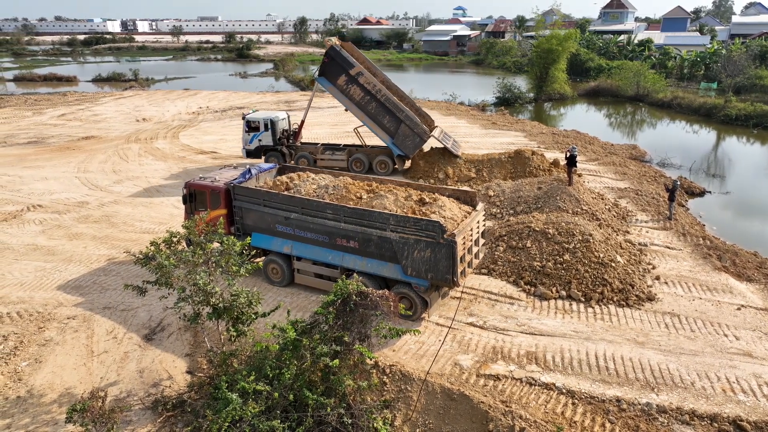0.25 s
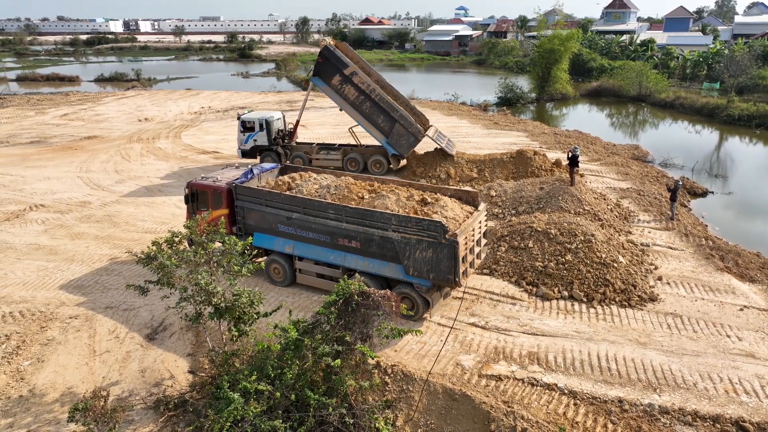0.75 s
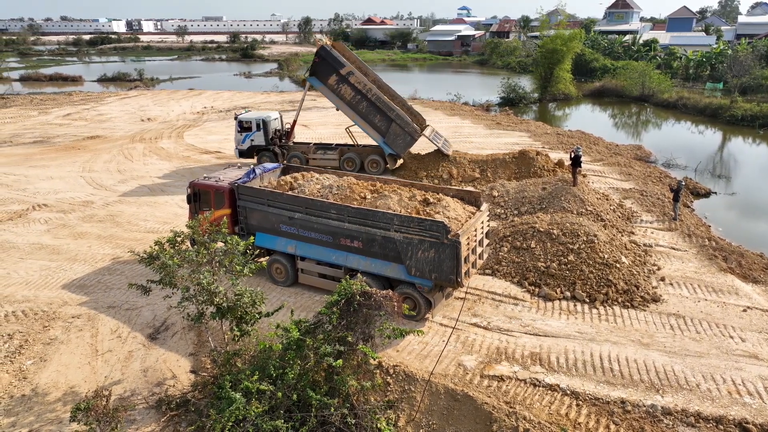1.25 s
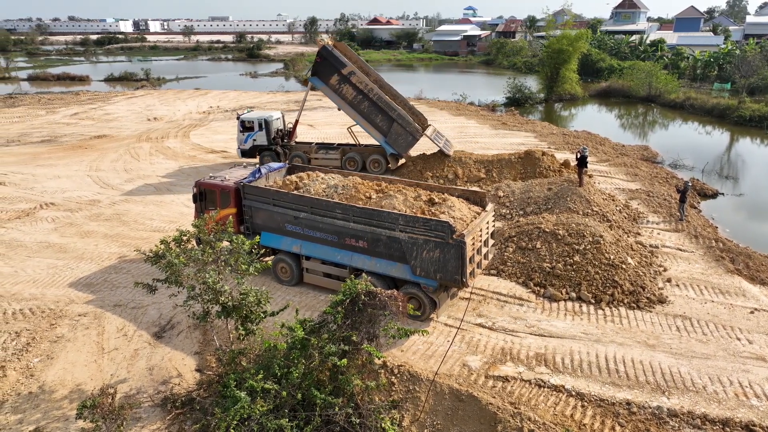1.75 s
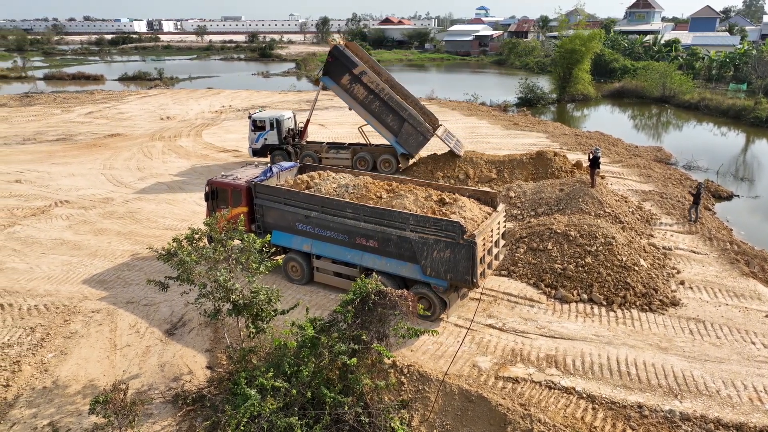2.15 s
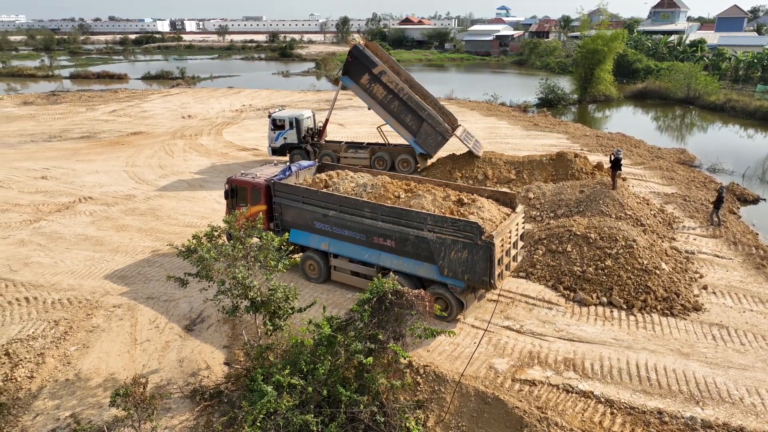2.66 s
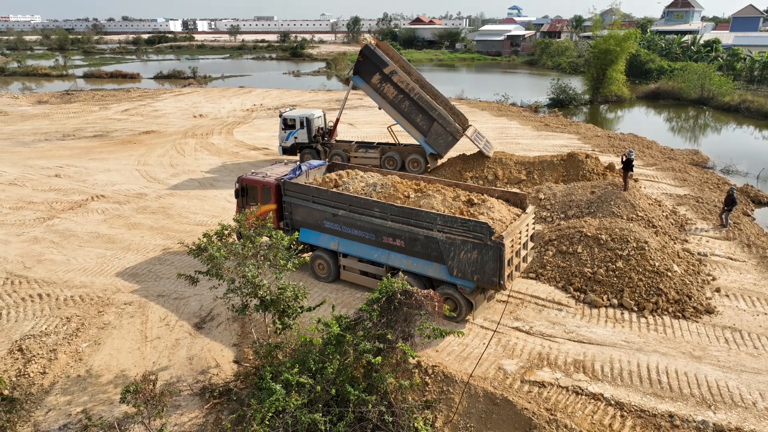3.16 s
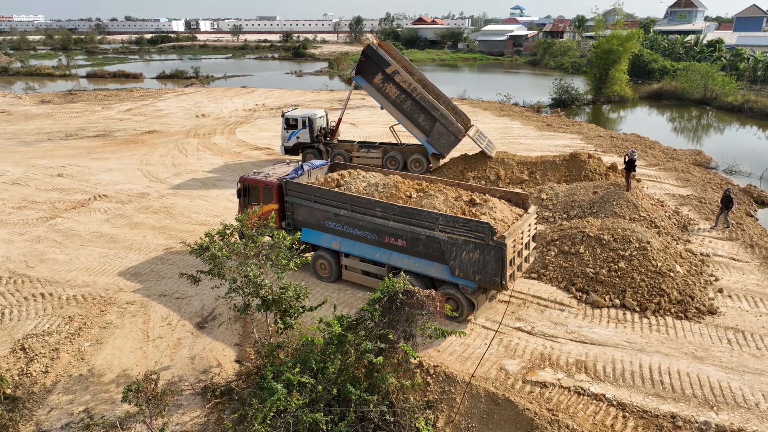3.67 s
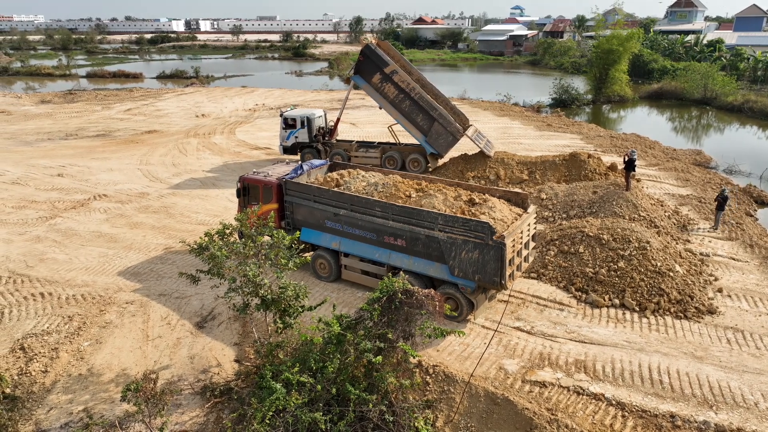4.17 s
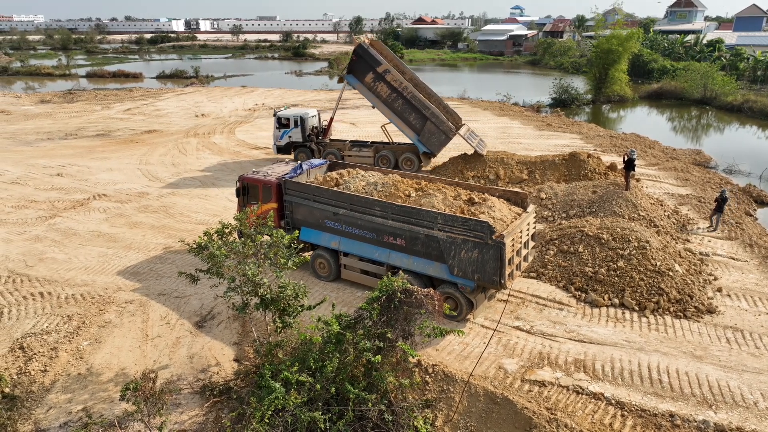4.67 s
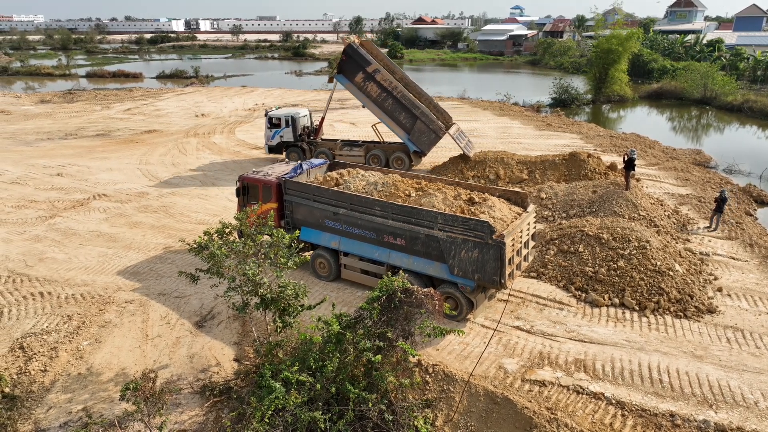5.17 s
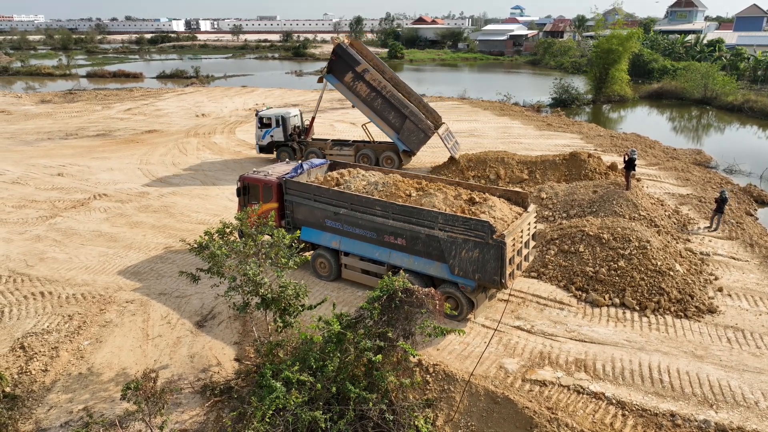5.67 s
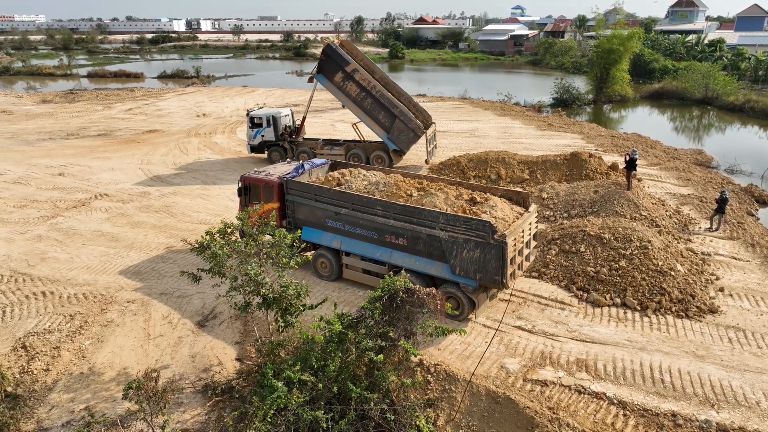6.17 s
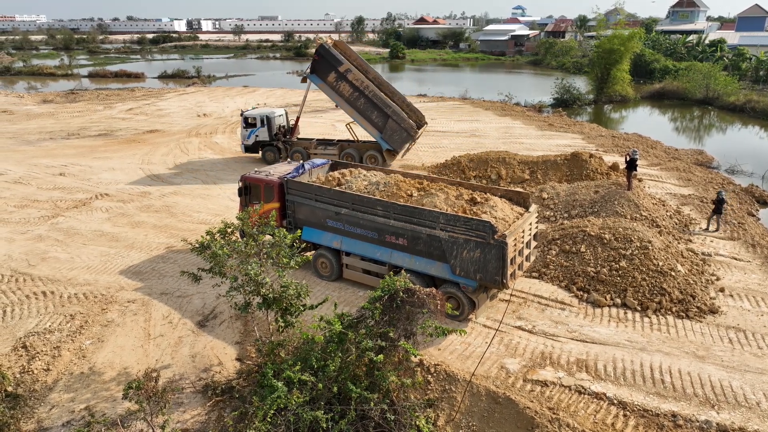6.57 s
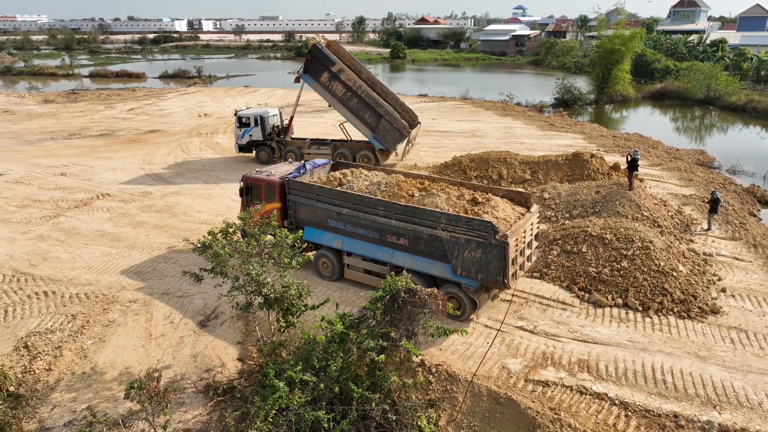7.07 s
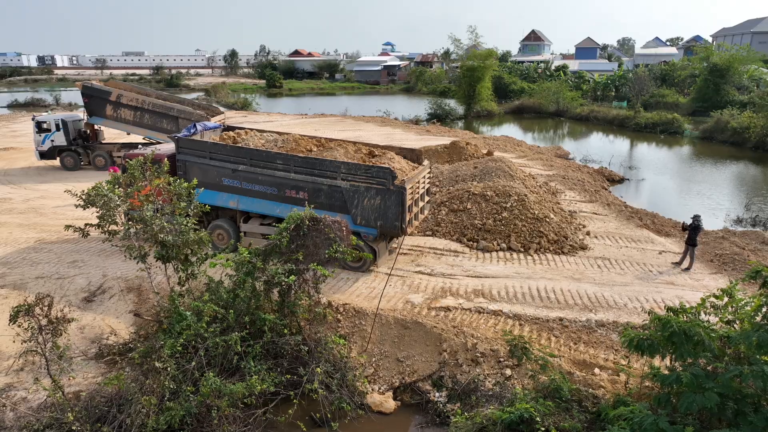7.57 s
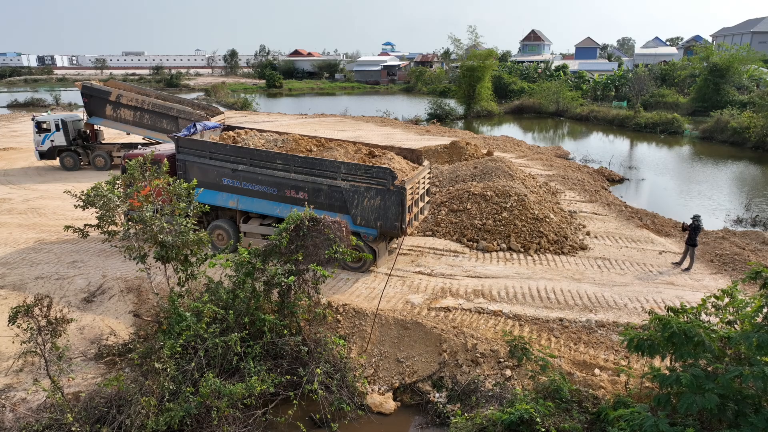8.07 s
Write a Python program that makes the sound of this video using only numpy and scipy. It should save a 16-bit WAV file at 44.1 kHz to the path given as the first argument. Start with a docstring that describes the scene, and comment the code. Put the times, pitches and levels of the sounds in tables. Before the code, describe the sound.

Outdoors on bare soil, a far diesel engine winds down and its roar recedes with a thin turbo whistle. A second engine surges and labours while low rumble swells as a load tips. Loose tailgate knocks lead to a heavy steel slam near seven seconds. A tiny silent cut follows, then a closer, louder diesel idles steadily with clattering knock and tiny air puffs. Stereo microphones, dull top treble.

```python
"""Two diesel trucks work far off on open soil, built from exhaust tones and roar: one engine slows, one surges.
Struck plate modes make a steel tailgate knock and slam, low noise swells as rumble, filtered hiss makes
air valves puff. After a hard cut with a short silence a third engine idles and clatters closer by, its
knock ringing the engine block, with more puffs. A pair of microphone ports hears each engine straight,
off a face nearby and scattered."""
import sys
import numpy as np
from scipy import signal
from scipy.fft import rfft, irfft
from scipy.io import wavfile
from scipy.ndimage import uniform_filter1d

SR = 44100
rng = np.random.default_rng(int(sys.argv[2]) if len(sys.argv) > 2 else 0)


def voltage_ratio(level):
    """Linear amplitude factor for a level in decibels (scalar or array-like)."""
    return 10 ** (np.asarray(level, float) / 20)


def int16_out(signal):
    """Quantize to a 16-bit WAV file."""
    q = np.round(np.clip(np.atleast_2d(signal).T, -1, 1) * 32767)
    wavfile.write(sys.argv[1], SR, q.astype(np.int16))


N = 366912

# Exhaust tones of the slowing engine. Each row: multiple of shaft speed, relative level in dB.
SLOWING_ORDERS = [(3, 2), (5, -9.5), (6, -2.5), (7, -11), (8, -.5), (9, -10), (11, -13.5), (15, -12)]
# Course of the surging engine. Each row: time in seconds, firing rate in Hz, exhaust level in dB.
SURGING_COURSE = [(2.2, 41, -38), (2.75, 43, -42.5), (3.1, 44.3, -37.5), (3.5, 46.4, -27.5),
                  (3.72, 44, -33), (3.85, 41.1, -40), (4.05, 40, -39), (4.5, 44.9, -37.5),
                  (4.85, 45.85, -33), (5.1, 45.3, -33.5), (5.35, 43.1, -34), (6.0, 42.8, -31),
                  (6.5, 44.84, -29), (7.3, 48.2, -32)]
# Exhaust tones of the surging engine. Each row: multiple of firing rate, relative level in dB.
SURGING_ORDERS = [(2, -14), (8 / 3, -4), (3, 0), (3.5, -20), (5, -17)]
# Exhaust tones of the idling engine. Each row: multiple of firing rate, relative level in dB.
IDLING_ORDERS = [(1, -19), (2, 2), (3, -3), (3.5, -9), (4, -5.5), (5, -5.5), (5.5, -2), (6, -4), (7, -5.5),
                 (9, 0.5), (10, -6.5), (22, -3.5), (32.7, -5)]
# Spectrum of the far trucks' roar before its treble lift. Each row: frequency in Hz, level in dB.
FAR_COLOUR = [(32, -74), (45, -7), (130, -6), (300, -10), (365, -21), (430, -21.5), (600, -18),
              (760, -16.5), (900, -21.5), (1150, -20), (1700, -25), (2200, -28), (3300, -34), (4000, -32),
              (5200, -33.5), (8500, -39.5), (10200, -35), (11500, -48.5), (12300, -57)]
# Spectrum of the near truck's roar before its treble lift. Each row: frequency in Hz, level in dB.
NEAR_COLOUR = [(30, -4), (60, -2), (150, -8), (330, -2), (450, -9.5), (700, -3.5), (1100, -8.5), (1700, -9),
               (2700, -20), (4000, -27.5), (6000, -35), (8500, -40.5), (10000, -33), (11500, -45),
               (12500, -48)]
# Resonances of the engine block. Each row: frequency in Hz, width in Hz of each of two passes,
# relative level in dB, strength of the steady rattle beside the firing bursts.
BLOCK_RESONANCES = [(603, 30, -7, 2.5), (896, 30, -5, 2.5), (1285, 70, -4, 1), (1680, 240, 5, .07),
                    (2715, 300, -5.5, .03)]
# Tailgate blows. Each row: start in seconds, level in dB before a common trim, weight from 0 to 1,
# frequency in Hz round which the struck spot favours the modes.
TAILGATE_BLOWS = [(0.46, -19, 0.22, 1160), (5.226, -10.5, 0.11, 1900), (5.39, -24, 0.34, 600),
                  (5.404, -21.5, 0, 1170), (5.563, -13, 0, 685), (5.582, -23.5, 0.23, 1150),
                  (5.838, -12, 0, 1150), (5.862, -29, 0.14, 1120), (6.788, -19.5, 0, 2070),
                  (6.796, -10, 0.48, 1050), (6.803, -5.5, 0.45, 935), (6.85, -21.5, 0.91, 121),
                  (6.957, -27, 0.83, 226), (7.168, -18, 0, 804)]
# Plate modes of the tailgate. Each row: nominal frequency in Hz, relative level in dB,
# time in seconds to die by 60 dB, before the blow's ring factor.
TAILGATE_MODES = [(112.9, -1, 0.48), (200, -1, 0.81), (216, -6.5, 1.1), (261, -7, 1.24), (337, -24, 0.87),
                  (413, -20, 0.36), (477, -18, 0.27), (538, -4, 0.46), (589, -12, 0.94), (719, -6, 0.66),
                  (955, -5, 0.43), (1005, -14.5, 1.1), (1110, -5, 0.28), (1143, -10.5, 0.37),
                  (1196, -15.5, 1.27), (1573, -7, 0.17), (1697, -12, 0.2), (2070, -10, 0.22),
                  (2220, -17, 0.3), (2370, -10.5, 0.12), (3234, -18, 0.18), (3930, -15, 0.14),
                  (4180, -18, 0.1)]
# Spectrum of a blow's noisy slap, before the blow's tilt. Each row: frequency in Hz, level in dB.
SLAP_COLOUR = [(60, -33), (150, 3.5), (600, 0), (1150, -3), (1550, -12.5), (2150, -14.5), (3200, -20),
               (4300, -21), (9000, -39), (10500, -68)]
# Air valve puffs. Each row: start in seconds, level in dB before the fades, centre in Hz,
# width in Hz, length in seconds.
PUFFS = [(0.457, -37, 5740, 4000, 0.031), (5.922, -41.5, 3800, 2500, 0.073), (6.07, -43, 3800, 2500, 0.13),
         (7.433, -44, 11000, 1500, 0.029), (7.62, -40.5, 10000, 2500, 0.027),
         (7.803, -37.5, 6000, 400, 0.022), (7.914, -36.5, 5730, 800, 0.023), (8.02, -35, 6000, 350, 0.025),
         (8.022, -42, 5480, 200, 0.022)]
# Power that reaches the ports unscattered. Each row: frequency in Hz, share of the power.
STRAIGHT_SHARE = [(150, .97), (350, .9), (900, .8), (2400, .66), (2900, .45), (4500, .45), (7500, .45),
                  (9600, .93), (9900, .99), (10600, .99), (11200, .75)]
# The silence at the cut: start in seconds, end in seconds.
SILENCE_S = (7.2802, 7.2884)
# Port balance for the far trucks. Each row: frequency in Hz, left louder by dB.
FAR_BALANCE = [(300, .4), (640, -4), (1150, -2.5), (2100, .5), (6500, 5.5), (9500, .5)]
# Port balance for the near truck. Each row: frequency in Hz, left louder by dB.
NEAR_BALANCE = [(330, .7), (640, -7.5), (1150, -5), (2100, -1), (6500, 4.5), (9500, .5)]
# Port phase for the far trucks. Each row: frequency in Hz, left leads by radians.
FAR_LEAD = [(0, 0), (700, -.6), (2100, -1), (3000, 3.5), (4200, 5.5), (5300, 3.5), (7000, 6.5), (8300, 8.5),
            (8700, 6.2), (9800, 3.15), (10400, 3.1), (11700, 0)]
# Port phase for the near truck. Each row: frequency in Hz, left leads by radians.
NEAR_LEAD = [(0, 0), (600, -1.4), (1500, -1), (2500, -2.1), (3300, -3.3), (5000, -5.2), (7200, -7.2),
             (8200, -4), (8700, -6.4), (9800, -9.42), (10850, -9.45), (11700, -12.56)]
# Swells of low rumble. Each row: start in seconds, rise in seconds, length in seconds with the rise,
# level in dB at the start of the growth, growth in dB per second.
SWELLS = [(4.082, 0.17, 0.42, -22.5, -10.5), (4.6, 0.31, 0.6, -23, -1), (5.397, 0.07, 0.32, -17, -14),
          (5.783, 0.11, 0.57, -20.5, 10.5), (6.79, 0.046, 0.23, -21, -13)]
# The turbo whistle is heard: from seconds, to seconds.
TURBO_SPAN_S = (.45, 2.85)

FAR_BEAT, NEAR_BEAT = .25, .2  # depth of the firing beat in the roar
PATCHY_DB = .8  # rms of the drifting patches in every roar

# slowing engine: top of its arch, exhaust level there and fall with speed, end of its exhaust tones
TOP_S, TOP_HZ, SAG_HZ_PER_S2 = .55, 21.3, 1.85
TOP_DB, FALL_DB_PER_HZ, SHUT_S = -28, 2, 2.5
# its truck pulls away; roar level at the first distance, treble lift
LEAVE_S, DISTANCE_M, SPEED_M_PER_S, LEAVING_DB, LEAVING_LIFT_DB = 0.96, 27.2, 19.8, -32, 2.5
# its turbo whistle lags the engine: top of the arch, level at the first distance
TURBO_S, TURBO_HZ, TURBO_DB, TURBO_SAG_HZ_PER_S2 = 1.4, 5175, -47.5, 370

# tailgate: factor on the modes' ring time, tilt of the spectrum, share of slap, for weights 0 and 1
LIGHT_RING, HEAVY_RING = 0.33, 1.03
LIGHT_TILT_DB_PER_OCTAVE, HEAVY_TILT_DB_PER_OCTAVE = 3, -5.5
LIGHT_SLAP, HEAVY_SLAP = .62, 1.7
RATTLE_DB, RATTLE_T60_S, RATTLE_HZ = -17.5, 0.57, 55  # latches rattle on after a blow
SPOT_DB, SPOT_OCTAVES = 8, .3  # lift of the favoured modes and its reach

# surging engine: roar level at an exhaust level of -35 dB, share of exhaust changes that it follows
SURGE_ROAR_DB, SURGE_FOLLOW, SURGE_LIFT_DB = -41, 0.53, -3.5
SURGING_HUM_DB, HUM_FROM_S = -39, 2.55  # hum close to the firing rate, whatever the load
SWELL_FALL_DB_PER_S, BED_DB, BED_FROM_S = 78, -38, 2.5  # the bed is a constant rumble under the swells
SWELL_ROAR_DB = -22.5  # loose soil and panels rustle with each swell, this far under it

# idling engine
IDLE_HZ, IDLE_DB, FIRST_FIRING_S = 27.37, -32.5, 7.2712
IDLE_ROAR_DB, IDLE_LIFT_DB = -22.5, 4
BLOCK_DB, KNOCK_FADE_DB_PER_S = -22.5, 7  # the knock softens as the engine settles


def evened(x):
    """Scales to rms 1."""
    return x / np.sqrt(np.mean(x ** 2) + 1e-20)


def read(points, hz):
    """Reads a spectrum on a log-frequency axis."""
    f, value = np.transpose(points)
    return np.interp(np.log(hz + 1), np.log(f + 1), value)


def columns(rows, t):
    """Reads the curves of a table at times t."""
    s, *curves = np.transpose(rows)
    return [np.interp(t, s, curve) for curve in curves]


def drift(top_hz):
    """Slow chance of rms 1: noise kept under top_hz."""
    return evened(signal.lfilter(*signal.butter(2, top_hz, fs=SR), rng.standard_normal(N)))


def resonate(x, hz, width):
    """Shifts hz down to zero, smooths, and shifts back: a resonance of gain 1."""
    turn = np.exp(2j * np.pi * np.cumsum(hz * np.ones(len(x))) / SR)
    r = np.exp(-np.pi * width / SR)
    smooth = signal.lfilter([1 - r], [1, -r], x / turn)
    return 2 * (turn * smooth).real


def coloured(x, points):
    """Filters by a spectrum."""
    gain = voltage_ratio(read(points, np.fft.rfftfreq(len(x), 1 / SR)))
    return irfft(rfft(x) * gain, len(x))


def exhaust(hz, db, span, orders, waver_db, low_hz):
    """Tones on multiples of the engine speed, each wavering alone; the pipe hardly sounds under low_hz."""
    t = np.arange(N) / SR
    turns = np.cumsum(hz) / SR
    tones = 0
    for k, order_db in orders:
        level = voltage_ratio(order_db + waver_db * drift(7.8))
        pipe = 1 / (1 + (low_hz / (k * hz)) ** 12)
        tones = tones + level * pipe * np.cos(2 * np.pi * (k * turns + rng.random()))
    running = uniform_filter1d(1. * (t < span[1]) * (t >= span[0]), 2000)  # soft ends
    return np.sqrt(2) * voltage_ratio(db) * running * tones, turns


def firings(turns, fade):
    """A burst at each whole turn dies over the share fade of a turn; firings differ a little in strength."""
    strength = voltage_ratio(1.5 * rng.standard_normal(int(turns[-1]) + 2))
    return strength[turns.astype(int)] * np.exp(-(turns % 1) / fade)


def roar(level, lift_db, colour, turns, depth):
    """Combustion and fan noise in drifting patches of time and pitch, beating with each firing."""
    frames, hz = N // 256 + 5, np.fft.rfftfreq(1024, 1 / SR)
    real, imaginary, patches = rng.standard_normal((frames, 513, 3)).T
    patches = evened(uniform_filter1d(uniform_filter1d(patches, 10, 0), 12, 1))
    lifted_db = read(colour, hz) + lift_db * np.clip(hz / 6000, 0, 1)  # full lift from 6 kHz up
    shape_db = lifted_db[:, None] + PATCHY_DB * patches
    spectra = (real + 1j * imaginary) * voltage_ratio(shape_db)
    noise = signal.istft(spectra, nperseg=1024, noverlap=768)[1][:N]
    # the level is that of the middle band
    band = signal.sosfilt(signal.butter(4, [300, 2500], "band", fs=SR, output="sos"), noise)
    beat = evened(1 + depth * firings(turns, fade=.27))
    return noise / band.std() * beat * level


def turbo():
    """A thin whistle, wavering in pitch and level, on an arch of pitch."""
    t = np.arange(N) / SR
    sag_hz = np.minimum(TURBO_SAG_HZ_PER_S2 * (t - TURBO_S) ** 2, TURBO_HZ / 2)
    running = np.clip(np.minimum(t - TURBO_SPAN_S[0], TURBO_SPAN_S[1] - t) / 0.44, 0, 1)
    level = voltage_ratio(TURBO_DB + 2.2 * drift(8))
    hz = TURBO_HZ - sag_hz + 13 * drift(20)
    return running * level * np.sin(2 * np.pi * np.cumsum(hz) / SR)


def slowing_truck():
    """The engine sags from its top speed; roar and whistle weaken with distance as the truck pulls away."""
    t = np.arange(N) / SR
    sag_hz = np.minimum(SAG_HZ_PER_S2 * (t - TOP_S) ** 2, TOP_HZ / 2)
    exhaust_db = TOP_DB - FALL_DB_PER_HZ * sag_hz
    tones, turns = exhaust(TOP_HZ - sag_hz, exhaust_db, (0, SHUT_S), SLOWING_ORDERS, waver_db=1.5, low_hz=63)
    nearness = DISTANCE_M / (DISTANCE_M + SPEED_M_PER_S * np.maximum(t - LEAVE_S, 0))
    # three firings per turn of the shaft
    noise = roar(voltage_ratio(LEAVING_DB) * nearness, LEAVING_LIFT_DB, FAR_COLOUR, 3 * turns, depth=FAR_BEAT)
    return tones + noise + nearness ** 1.1 * turbo()


def puffs():
    """Short hisses of released air: noise in one resonance, cut steeply above it."""
    out = np.zeros(N)
    for s, db, hz, width, length in PUFFS:
        size = round(length * SR)
        hiss = resonate(rng.standard_normal(size), hz, width)
        hiss = coloured(hiss, [(hz + width, 0), (hz + 1.5 * width, -30)])
        out[round(s * SR):][:size] += voltage_ratio(db) * evened(hiss) * signal.windows.tukey(size, .5)
    return out


def tailgate():
    """Each blow: a noisy slap that dies fast, a rattle and plate modes; light blows ring short and bright."""
    out, t = np.zeros(N), np.arange(SR // 2) / SR
    edges = np.minimum(t / 0.0013, 1) * np.minimum((t[-1] - t) / 0.11, 1)  # soft start and end
    for s, db, weight, spot_hz in TAILGATE_BLOWS:
        ring = LIGHT_RING + (HEAVY_RING - LIGHT_RING) * weight
        tilt_db = LIGHT_TILT_DB_PER_OCTAVE + (HEAVY_TILT_DB_PER_OCTAVE - LIGHT_TILT_DB_PER_OCTAVE) * weight
        slap_share = LIGHT_SLAP + (HEAVY_SLAP - LIGHT_SLAP) * weight

        slap_fall = voltage_ratio(-60 * t / (0.62 * ring ** 1.93))
        rattle_fall = voltage_ratio(RATTLE_DB - 60 * t / RATTLE_T60_S)
        rattle = rattle_fall * (1 + np.cos(2 * np.pi * RATTLE_HZ * t) / 2)
        slap = evened(coloured(rng.standard_normal(len(t)), SLAP_COLOUR)) * np.hypot(slap_fall, rattle)

        modes = 0
        for hz, mode_db, t60 in TAILGATE_MODES:
            spot_db = SPOT_DB * np.exp(-(np.log2(hz / spot_hz) / SPOT_OCTAVES) ** 2)
            chance_db = 2 * rng.standard_normal()
            fall = voltage_ratio(mode_db + spot_db + chance_db - 60 * t / (t60 * ring))
            modes = modes + fall * np.sin(2 * np.pi * (hz * rng.uniform(0.98, 1.01) * t + rng.random()))

        # the tilt pivots on 1 kHz
        blow = coloured(slap_share * slap + .52 * modes, [(125, -3 * tilt_db), (4000, 2 * tilt_db)])
        part = out[round(s * SR):][:len(t)]
        part += (voltage_ratio(db - 7.5) * edges * blow)[:len(part)]
    return out


def swells():
    """Gain of the swells: a rise, a sloping hold, a steady fall; overlapping swells add in power."""
    t, power = np.arange(N) / SR, 0
    for s, rise, length, db, growth_db in SWELLS:
        after = np.maximum(t - s - length, 0)
        held_db = db + growth_db * np.clip(t - s, 0, length) - SWELL_FALL_DB_PER_S * after
        power = power + (np.clip((t - s) / rise, 0, 1) * voltage_ratio(held_db)) ** 2
    return np.sqrt(power)


def rumble(swell):
    """Lumpy low noise in a broad resonance, steep on both sides; the truck bed booms on one note."""
    t = np.arange(N) / SR
    lumps = voltage_ratio(1.3 * drift(18)) * rng.standard_normal(N)
    deep = evened(resonate(resonate(lumps, 79, 86), 79, 80))
    upper = evened(resonate(resonate(lumps, 208, 53), 208, 53))
    boom = evened(resonate(lumps, 102.2, 8.5))
    body = deep + 0.062 * upper + 0.23 * boom
    body = signal.sosfilt(signal.butter(8, 40, "high", fs=SR, output="sos"), body)
    bed = voltage_ratio(BED_DB) * np.clip((t - BED_FROM_S) / 0.34, 0, 1)
    return np.hypot(swell, bed) * evened(body)


def surging_truck():
    """The engine labours up and down; its roar follows the exhaust and the swells of rumble."""
    hz, db = columns(SURGING_COURSE, np.arange(N) / SR)
    start_s, end_s = SURGING_COURSE[0][0], SURGING_COURSE[-1][0]
    tones, turns = exhaust(hz, db, (start_s, end_s), SURGING_ORDERS, waver_db=1.5, low_hz=30)
    hum, _ = exhaust(hz, SURGING_HUM_DB, (HUM_FROM_S, end_s), [(0.99, 0)], waver_db=0.5, low_hz=30)
    swell = swells()
    engine_level = voltage_ratio(SURGE_ROAR_DB + SURGE_FOLLOW * (db + 35))
    level = np.hypot(engine_level, voltage_ratio(SWELL_ROAR_DB) * swell)
    noise = roar(level, SURGE_LIFT_DB, FAR_COLOUR, turns, depth=FAR_BEAT)
    return tones + hum + noise + rumble(swell)


def block(turns):
    """Diesel knock: a crack and a burst at each firing ring the engine block over a steady rattle."""
    running_s = np.maximum(np.arange(N) / SR - FIRST_FIRING_S, 0)
    bursts = voltage_ratio(-KNOCK_FADE_DB_PER_S * running_s) * firings(turns, fade=.38)
    noise = rng.standard_normal(N)
    cracks = 22 * np.maximum(np.diff(bursts, prepend=1), 0)  # the sudden onset of each burst
    rings = 0
    for hz, width, db, steady in BLOCK_RESONANCES:
        strike = (steady + bursts) * noise + cracks
        rings = rings + voltage_ratio(db) * evened(resonate(resonate(strike, hz, width), hz, width))
    return voltage_ratio(BLOCK_DB) * evened(rings)


def idling_truck():
    """Exhaust tones, roar and knock at one steady firing rate; roar and knock share the firing clock."""
    t = np.arange(N) / SR
    span = (FIRST_FIRING_S, N / SR + 1)  # runs on past the end
    tones, _ = exhaust(np.full(N, IDLE_HZ), IDLE_DB, span, IDLING_ORDERS, waver_db=0.5, low_hz=17)
    # a whole number of turns at the first firing
    turns = IDLE_HZ * (t - FIRST_FIRING_S) + np.ceil(IDLE_HZ * FIRST_FIRING_S)
    return tones + block(turns) + roar(voltage_ratio(IDLE_ROAR_DB), IDLE_LIFT_DB, NEAR_COLOUR, turns, depth=NEAR_BEAT)


def scattered(x, count=5):
    """Diffuse noisy echoes, other for each port; random tails take turns, which keeps the colour smooth."""
    t = np.arange(SR // 7) / SR
    tails = rng.standard_normal((count, 2, len(t))) * voltage_ratio(-60 * t / .14)
    place = np.arange(N) / SR * 30 % count  # hands over to the next tail 30 times a second
    out = np.zeros((2, N))
    for k, tail in enumerate(tails):
        away = abs((place - k + count / 2) % count - count / 2)
        fed = x * np.cos(np.pi / 2 * np.minimum(away, 1))
        out += signal.oaconvolve(fed[None], tail, axes=1)[:, :N]
    return out / np.linalg.norm(tails[0, 0])


def ports(x, balance, lead, bounce_s, bounce):
    """The straight sound with one near bounce reaches both ports; scattered sound differs in each."""
    hz, side = np.fft.rfftfreq(N, 1 / SR), np.array([[.5], [-.5]])  # left, right
    bounce = bounce * np.exp(-hz / 5000) * hz ** 2 / (hz ** 2 + 450 ** 2)  # a small face returns no bass
    comb = (1 + bounce * np.exp(-2j * np.pi * hz * bounce_s)) / np.sqrt(1 + bounce ** 2)
    straight = comb * np.exp(1j * side * np.interp(hz, *np.transpose(lead)))
    share = np.clip(read(STRAIGHT_SHARE, hz), 0, 1)
    both = np.sqrt(share) * straight * rfft(x) + np.sqrt(1 - share) * rfft(scattered(x))
    return irfft(both * voltage_ratio(side * read(balance, hz)), N)


def scene():
    """The far trucks up to the cut, a gap, then the near truck; air puffs on both sides."""
    air, t = puffs(), np.arange(N) / SR
    far = slowing_truck() + surging_truck() + tailgate() + air
    near = idling_truck() + air
    before = ports(far, FAR_BALANCE, FAR_LEAD, bounce_s=0.00178, bounce=.68)
    after = ports(near, NEAR_BALANCE, NEAR_LEAD, bounce_s=0.0017, bounce=0.063)
    return before * (t < SILENCE_S[0]) + after * (t > SILENCE_S[1])


def band_limit(x):
    """A steep low-pass at the top of the band."""
    return signal.sosfilt(signal.butter(12, 12850, fs=SR, output="sos"), x)


def record(dry):
    """The microphone loses the top treble, above 12 kHz."""
    heard = signal.sosfilt(signal.butter(8, 12000, fs=SR, output="sos"), dry)
    return band_limit(heard)


dry = scene()
out = record(dry)
int16_out(out)
```